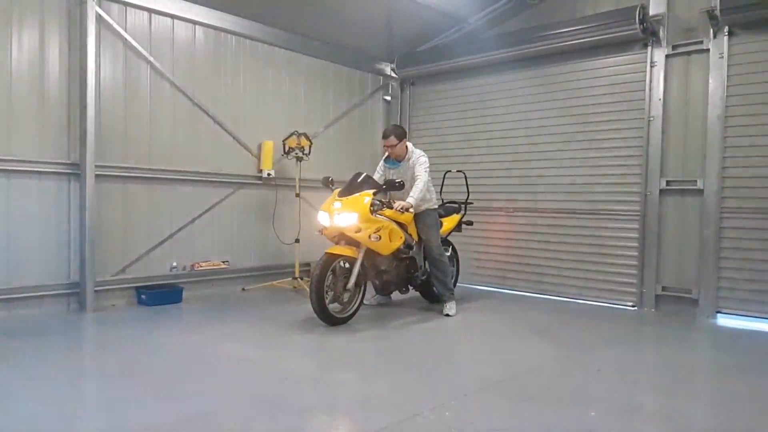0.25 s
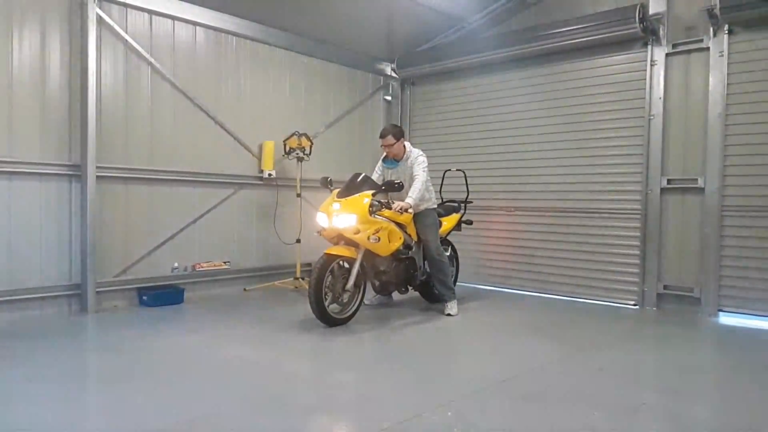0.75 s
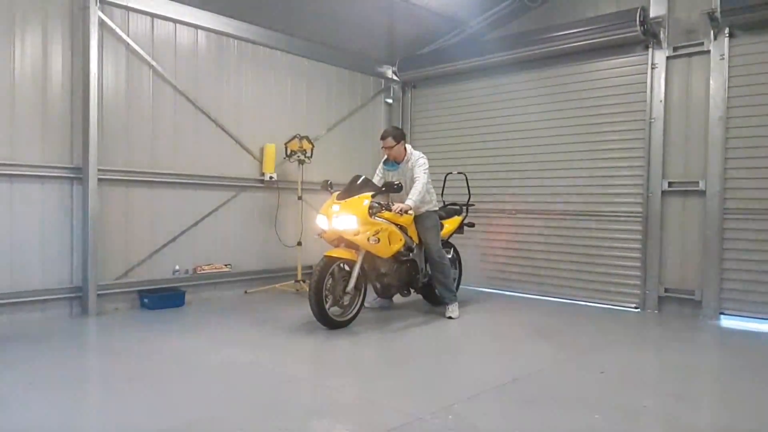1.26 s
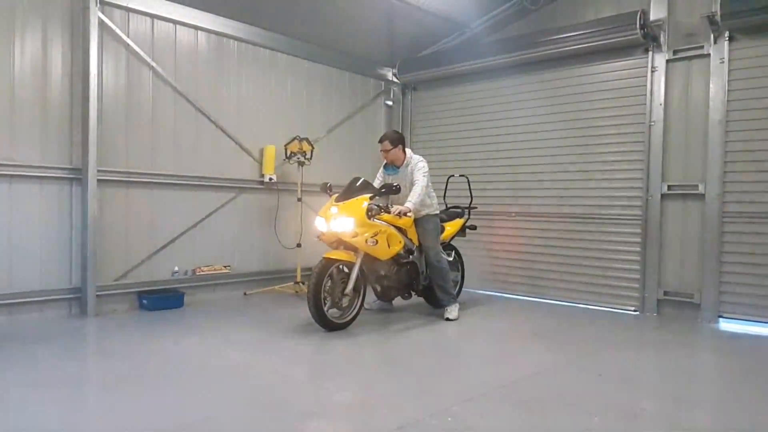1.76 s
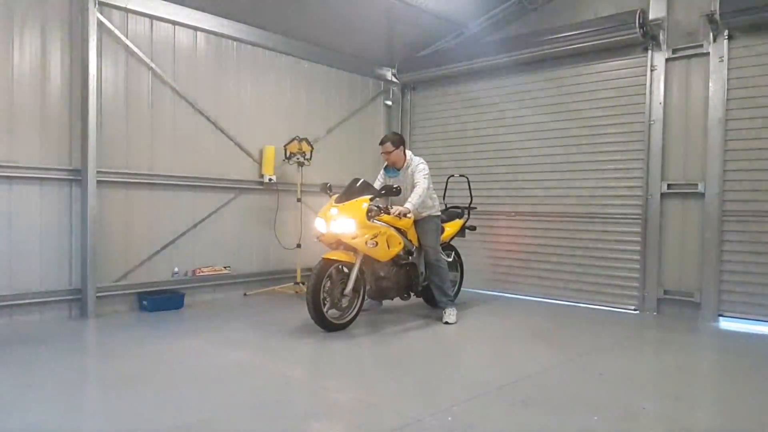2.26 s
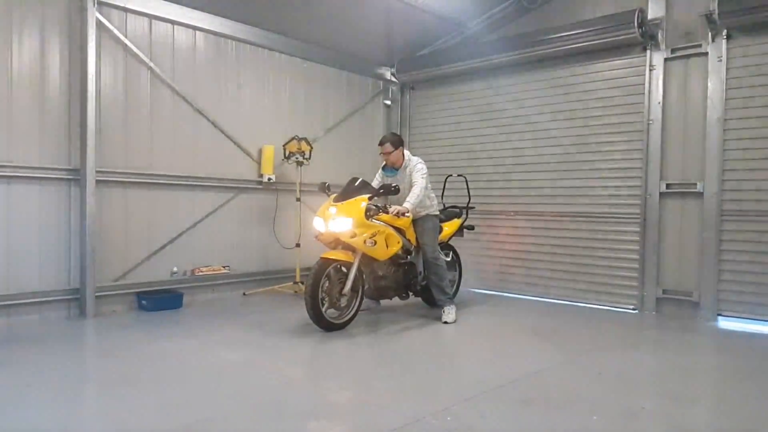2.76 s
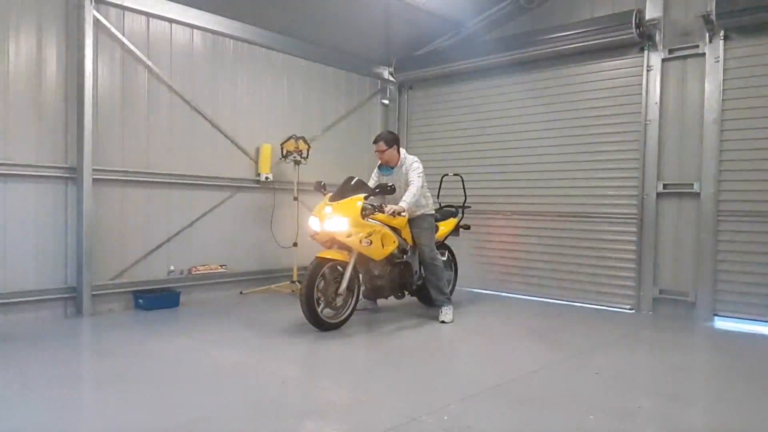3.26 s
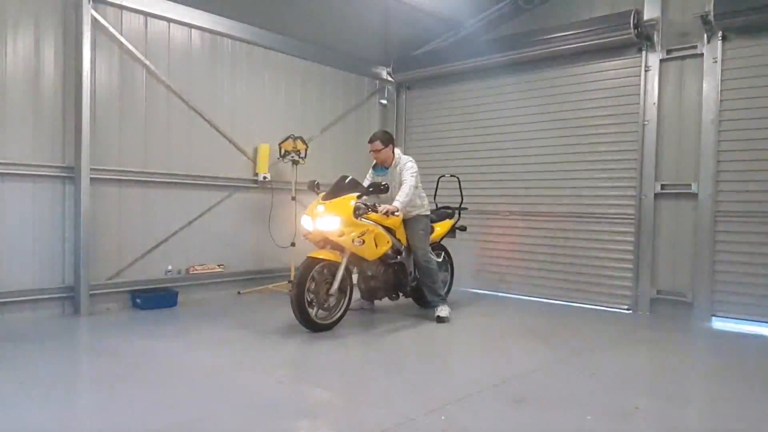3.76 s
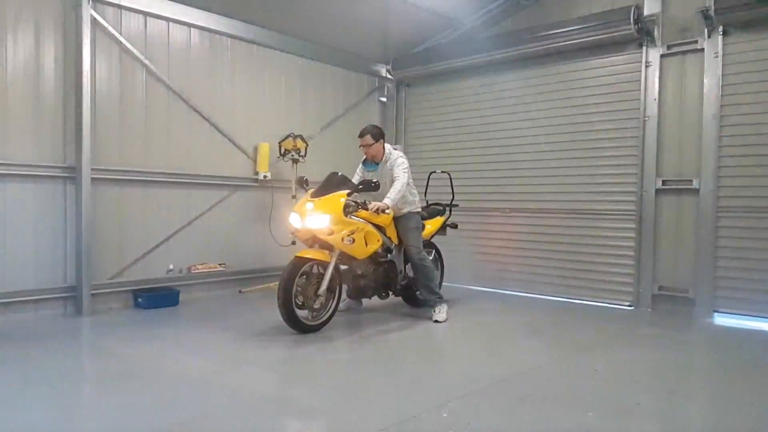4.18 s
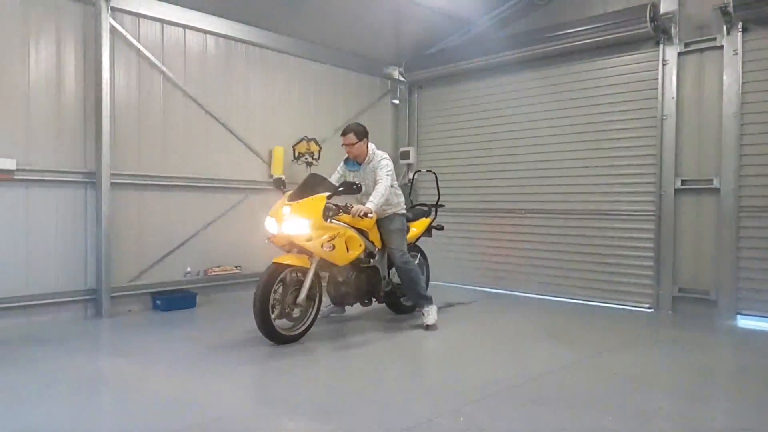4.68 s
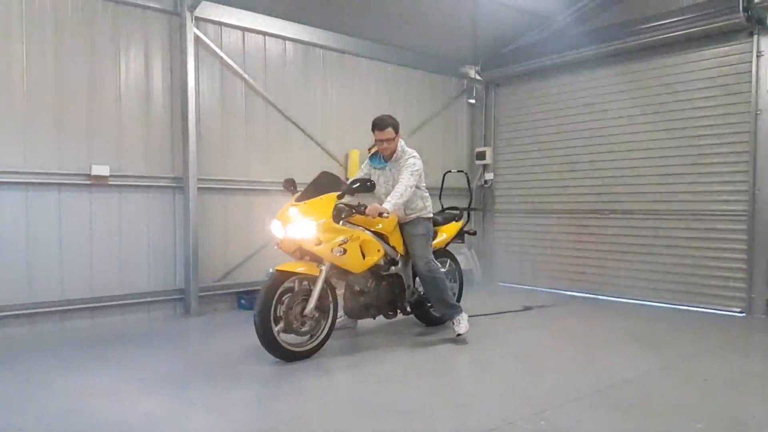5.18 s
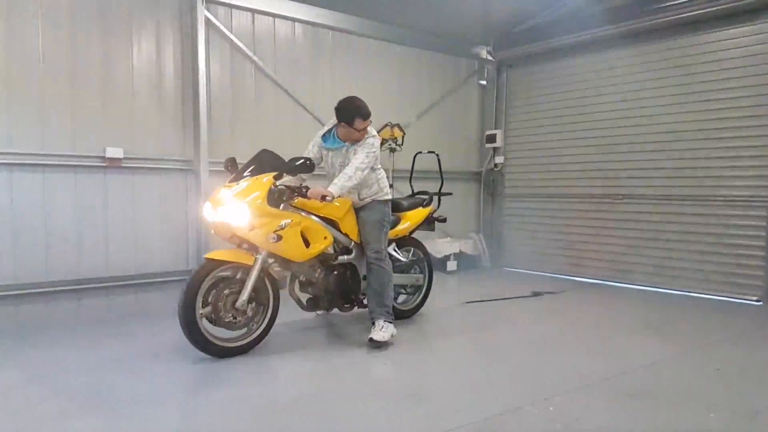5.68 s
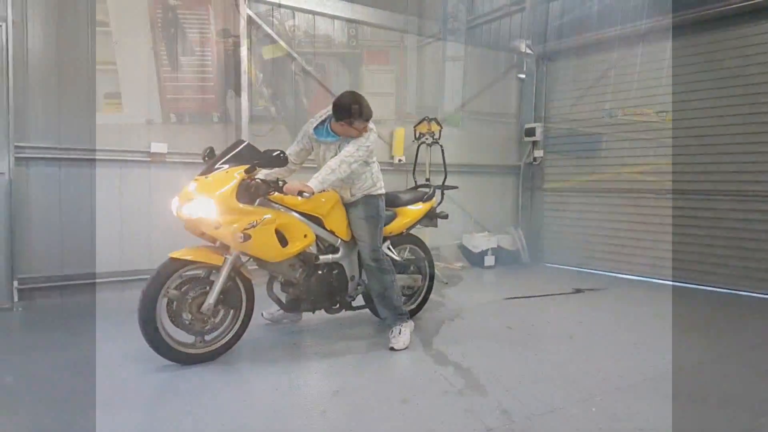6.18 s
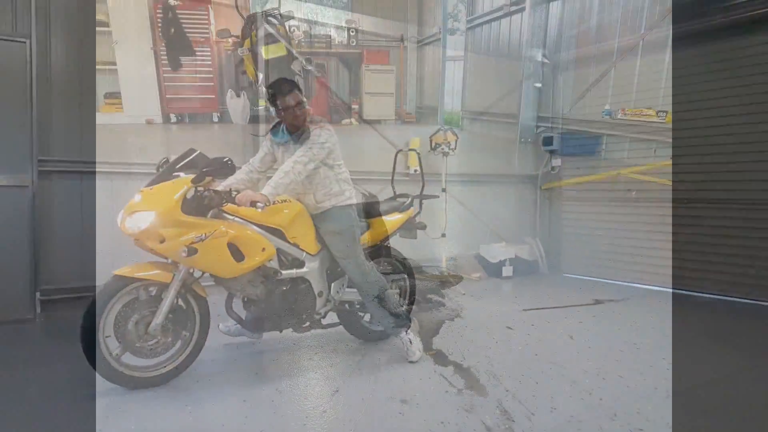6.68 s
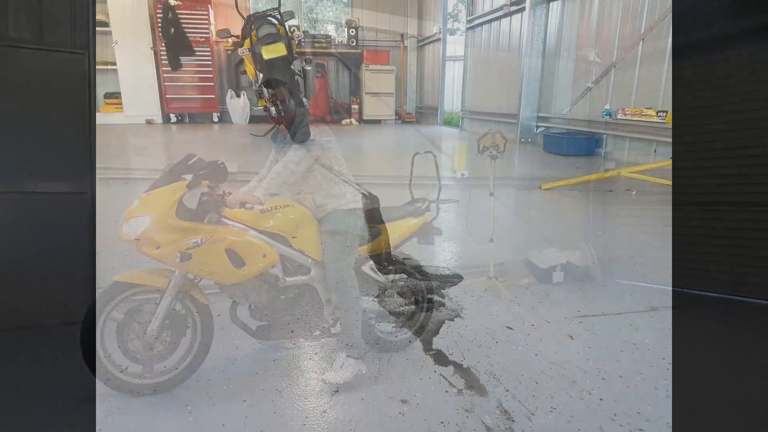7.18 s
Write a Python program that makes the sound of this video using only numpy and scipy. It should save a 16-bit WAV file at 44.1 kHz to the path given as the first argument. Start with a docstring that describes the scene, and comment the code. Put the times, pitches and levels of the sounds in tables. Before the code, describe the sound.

A two-cylinder motorcycle roars at high revs in a metal garage, tyre scrubbing the concrete, then squeals, runs down and settles into lumpy idle puffs.

```python
"""A V-twin motorcycle roars at high revs in a sheet-metal garage while its rear tyre spins on concrete.
Twice at high revs the firing turns uneven; then the throttle shuts, the tyre squeals and the revs run down.
Last come slow paired idle puffs that swell and fade. The high-rev note is a stack of sine waves, the puffs
are clicks ringing in resonances, and the roar, rasp and squeal are shaped noise."""
import sys
import numpy as np
from scipy import signal
from scipy.fft import rfft, irfft, next_fast_len
from scipy.io import wavfile
from scipy.ndimage import uniform_filter1d

SR = 44100
rng = np.random.default_rng(int(sys.argv[2]) if len(sys.argv) > 2 else 0)


def log_audio(samples):
    """Write samples as a 16-bit WAV file to the path given in sys.argv[1]."""
    # one column per channel
    frames = np.atleast_2d(samples).T
    # limit to full scale, then quantise
    limited = np.clip(frames, -1, 1)
    pcm = np.round(limited * 32767).astype(np.int16)
    wavfile.write(sys.argv[1], SR, pcm)


N = 328104   # length of the sound in samples


# Loudness of the exhaust: t/s, level/dB
EXHAUST_LEVEL = [(0, -9.5), (.5, -6.5), (1.06, -8), (1.55, -8.5), (2.08, -7.5), (2.45, -7), (3.05, -8.5),
                 (3.66, -9.5), (4.36, -8), (4.43, -14.5), (4.52, -28), (4.67, -15.5), (4.77, -23),
                 (4.82, -11), (5.02, -17.5), (5.1, -14.5), (5.3, -18.5), (5.45, -24)]
# How much of the open-throttle note is left: t/s, level/dB
THROTTLE = [(0, 0), (4.42, 0), (4.68, -2), (4.85, -11), (5.45, -12)]
COAST_WET_DB = -7   # garage echo on the shut-throttle thumps


def exhaust(firing_s, unevenness):
    """With the throttle open the pipe sings; with it shut the silencer thumps."""
    t = np.arange(N) / SR
    load = amp(in_time(THROTTLE)[0])
    strengths = amp((unevenness + 1.5) * rng.standard_normal(len(firing_s)))
    thumps = silencer(firing_s, strengths, COAST_WET_DB)
    singing = load * evened(pipe_note(firing_s, unevenness), 0.031)
    thumping = (1 - load) * evened(thumps, 0.096)
    fade_out = np.interp(t, [5.36, 5.43], [1, 0])   # the idle puffs take over
    return evened(singing + thumping, 0.33) * amp(in_time(EXHAUST_LEVEL)[0]) * fade_out


# Strength of each multiple of the cycle rate, before the resonances: multiple, level/dB
MULTIPLES = [(1, 2), (2, 2.5), (3, 3.5), (4, -0.5), (5, -3), (6, 6), (7, -1), (8, 7.5), (9, 6.5), (10, -33),
             (11, 6), (12, 5), (13, 6.5), (14, -5.5), (15, 1), (16, -34), (17, 1.5), (18, 3.5), (19, 3.5),
             (20, -16), (21, 2.5), (22, -0.5), (23, -12), (24, 2)]
# Pipe and garage resonances, compared with one another: f/Hz, width/Hz, level/dB
PIPE_RESONANCES = [(81.6, 9.3, -4.5), (172, 96, 6.5), (221.3, 11.5, 9.5), (329.3, 38, 10),
                   (384.2, 33.4, 8.5), (459.6, 46, 2), (523, 24, -1.5), (579, 37, 1), (650, 93, -5),
                   (748.5, 72, -3), (841.4, 30, -7), (951, 78, -7.5), (1270, 290, -32), (1400, 350, -10),
                   (1873, 226, -6), (2570, 610, -15), (3100, 1200, -33)]
WANDER_DB, WANDER_S = 2.5, .14   # typical swell of each multiple, and time between its random steps
LOAD_WET_DB = -10                # garage echo on the pipe note


def pipe_note(firing_s, unevenness):
    """Sines at multiples of the cycle rate, loud near a resonance; uneven firing shakes each its own way."""
    cycle_hz, turns = crank()
    stop = int(RUN_DOWN[-1][0] * SR)
    t = np.arange(stop) / SR
    grid_hz = np.arange(4200.)
    power = sum(amp(2 * db) / (1 + (2 * (grid_hz - hz) / width) ** 2) ** 2
                for hz, width, db in PIPE_RESONANCES)
    response = np.sqrt(power)
    levels_db = np.r_[np.array(MULTIPLES)[:, 1], np.full(22, -3.0)]   # 22 more multiples above the table
    note = np.zeros(N)
    for k, db in enumerate(levels_db, start=1):
        shake = unevenness * rng.standard_normal((2, len(firing_s)))
        phase_shake = np.interp(t, firing_s, .13 * shake[0])   # radians
        phase = 2 * np.pi * (k * turns[:stop] + rng.random()) + phase_shake
        level_shake = np.interp(t, firing_s, amp(.6 * shake[1]))
        resonance = np.interp(k * cycle_hz[:stop], grid_hz, response)
        # each multiple swells and fades on its own
        steps_s = np.arange(0, N / SR, WANDER_S)
        wander = amp(np.interp(t, steps_s, WANDER_DB * rng.standard_normal(len(steps_s))))
        note[:stop] += amp(db) * level_shake * resonance * wander * np.sin(phase)
    return garage(note, LOAD_WET_DB)


# Engine cycles per second at high revs: t/s, f/Hz
HIGH_REVS = [(0.0, 78.8), (0.32, 82.08), (0.59, 81.21), (0.94, 82.01), (1.14, 75.93), (1.26, 81.04),
             (1.47, 88), (1.57, 83.42), (1.63, 79.22), (1.97, 77.46), (2.28, 71.33), (2.46, 73.98),
             (2.79, 80.8), (2.88, 81.81), (3.05, 74.76), (3.31, 84.98), (3.47, 88.05), (3.54, 80.4),
             (3.74, 79.35), (3.81, 75.93), (4.09, 75), (4.17, 77.89), (4.25, 75.83), (4.4, 77.84)]
# Engine cycles per second as the revs drop: t/s, f/Hz
RUN_DOWN = [(4.45, 76), (4.52, 71.5), (4.66, 64), (4.8, 53.3), (4.9, 43), (5.04, 33.5), (5.24, 26),
            (5.3, 23.8), (5.45, 18)]


def crank():
    """Cycle rate in Hz, and its running sum: the cycles turned so far."""
    cycle_hz = in_time(HIGH_REVS + RUN_DOWN)[0]
    return cycle_hz, np.cumsum(cycle_hz) / SR


# Spells of uneven burning: start t/s, hold t/s, unevenness (scales the random shake of each firing)
STUMBLES = [(1.1, .2, 2.3), (1.4, .25, 5.5), (3.3, .2, 5.5), (3.7, .7, 2.2), (4.43, .13, 8.5)]
STEADY_UNEVENNESS, STUMBLE_RISE_S, STUMBLE_FALL_S = .7, .1, .2
REAR_LAG_CYCLES = 3 / 8   # 270 degrees of a 720-degree cycle


def firings():
    """Firing times and their unevenness: the front cylinder, then the rear one 270 degrees later."""
    turns = crank()[1]
    count = np.arange(int(turns[int(RUN_DOWN[-1][0] * SR)]))
    both_cylinders = np.c_[count, count + REAR_LAG_CYCLES].ravel()
    firing_s = np.interp(both_cylinders, turns, np.arange(N) / SR)
    spells = []
    for start, hold, peak in STUMBLES:
        corners_s = [start - STUMBLE_RISE_S, start, start + hold, start + hold + STUMBLE_FALL_S]
        spells.append(np.interp(firing_s, corners_s, [0, peak, peak, 0]))
    return firing_s, np.maximum(np.max(spells, axis=0), STEADY_UNEVENNESS)


PUFF_SPREAD_DB, PUFF_JITTER_S = 1.5, .002   # typical random change in strength and timing
IDLE_WET_DB = -1                            # garage echo on the puffs


def idle():
    """Slow exhaust puffs, each a little stronger or weaker, earlier or later."""
    puff_s, strength_db = puffs()
    chance = rng.standard_normal((len(puff_s), 2))
    uneven_s = puff_s + PUFF_JITTER_S * chance[:, 0]
    uneven_db = strength_db + PUFF_SPREAD_DB * chance[:, 1]
    return silencer(uneven_s, amp(uneven_db), IDLE_WET_DB)


# Idle pace, steady from each time on: t/s, cycle rate f/Hz, rear lag/cycles, third thump level/dB
IDLE_PACE = [(5.382, 15.42, .37, -30), (5.771, 8.62, .38, -8), (6.119, 9.28, .3, -6),
             (6.658, 8.95, .33, -16)]
# Strength of the idle puffs as they enter the silencer: t/s, level/dB
IDLE_STRENGTH = [(5.38, -15.5), (5.5, -14.5), (5.66, -32), (5.71, -22), (5.9, -12.5), (6.2, -6.5),
                 (6.5, -8), (6.8, -12), (7.1, -17), (7.44, -32)]
REAR_PUFF_DB, THIRD_LAG_CYCLES = -2.5, .69


def puffs():
    """Idle puff times and strengths: front cylinder, rear cylinder, and a weaker third thump later in each
    cycle."""
    start, rate, lag, third_db = np.transpose(IDLE_PACE)
    knots_s = np.r_[start, N / SR]
    turns = np.r_[0, np.cumsum(rate * np.diff(knots_s))]
    count = np.arange(int(turns[-1]) + 1)
    # the row of the pace table that each cycle falls in
    row = np.searchsorted(np.round(turns), count, side="right").clip(1, len(rate)) - 1
    puff_turns = np.c_[count, count + lag[row], count + THIRD_LAG_CYCLES]
    puff_s = np.interp(puff_turns, turns, knots_s)
    step_db = np.c_[0 * count, 0 * count + REAR_PUFF_DB, third_db[row]]
    strength_db = np.interp(puff_s, *np.transpose(IDLE_STRENGTH)) + step_db
    return puff_s.ravel(), strength_db.ravel()


# Silencer resonances: f/Hz, width/Hz of one pass, input level/dB, lag t/s (from 3 ms before the puff)
SILENCER = [(80, 55, -17, 0), (128, 56, -6, .002), (190, 85, -6.5, .006), (290, 100, -15, .010),
            (400, 120, -15, .011)]


def silencer(puff_s, sizes, wet_db):
    """Each soft puff swells and dies, upper chambers later: a click passes each resonance twice."""
    thumps = 0
    for hz, width, db, lag in SILENCER:
        kicks = clicks(puff_s + lag - .003, sizes * amp(db))
        once = resonate(kicks, hz, width)
        thumps = thumps + resonate(once, hz, width) * SR / width
    soft = signal.sosfilt(signal.butter(2, 260, fs=SR, output="sos"), thumps)   # low-pass at 260 Hz
    return garage(soft, wet_db)


GARAGE_T60_S = .9   # time for the echo to die by 60 dB


def garage(x, wet_db):
    """Adds the dense echo of the metal walls: noise that starts after 8 ms and dies away."""
    t = np.arange(int(GARAGE_T60_S * SR)) / SR
    tail = rng.standard_normal(len(t)) * amp(-60 * t / GARAGE_T60_S) * (t > .008)
    tail = tail / np.sqrt(np.sum(tail ** 2))
    return x + amp(wet_db) * signal.fftconvolve(x, tail)[:N]


# Tyre squeal: t/s, lowest band level/dB, second and third band level/dB against the lowest
SQUEAL_LEVEL = [(4.37, -16, -9, -9), (4.5, -22.5, -2.5, -10), (4.95, -12.5, -8, -17.5),
                (5.04, -18, -8, -18), (5.3, -23.5, -10, -25), (5.6, -37.5, -11.5, -24),
                (5.9, -52, -20, -25)]
# Squeal bands: f/Hz at pitch ratio 1, half-width/Hz of each smoothing stage
TREAD_BANDS = [(2150, 175), (3950, 400), (6350, 580)]
# Squeal pitch as the wheel slows: t/s, pitch ratio
SLIDE = [(4.4, 1.09), (4.9, 1.01), (5.2, .985), (5.9, 0.99)]


def squeal():
    """Tread blocks stick and slip: noise rings in three broad bands that sink with wheel speed."""
    level_db, second_db, third_db = in_time(SQUEAL_LEVEL)
    slide = np.cumsum(in_time(SLIDE)[0]) / SR
    bands = []
    for hz, width in TREAD_BANDS:
        slips = rng.standard_normal((2, N)) + 1j * rng.standard_normal((2, N))
        r = np.exp(-2 * np.pi * width / SR)
        # slow random wobble: the ring loses step within a few cycles
        wobble = signal.lfilter([1], [1, -2 * r, r * r], slips)
        bands.append(rms_one(np.real(wobble * np.exp(2j * np.pi * hz * slide))))
    # the tyre bites, then stands
    grips = np.interp(np.arange(N) / SR, [4.37, 4.45, 5.8, 5.95], [0, 1, 1, 0])
    mix = bands[0] + amp(second_db) * bands[1] + amp(third_db) * bands[2]
    return amp(level_db) * grips * mix


# Rasp bands: f/Hz, width/Hz of one pass, starting level/dB, share of the swing, drift in dB per s
RASP = [(2185, 260, -26, 0.95, 0), (3307, 830, -26, 0.68, -2)]
# The tread catches briefly and the rasp flares: t/s, level/dB before the band's share
CATCHES = [(.85, 5), (2.6, 7)]
CATCH_S = 0.055   # a flare falls to 37% of its dB this long before and after its peak


def rasp():
    """The tread scrubs the floor: two noisy bands that swell with the treble and stop as the tyre bites."""
    scrub = rng.standard_normal((2, N))
    t = np.arange(N) / SR
    swing_db = np.minimum(in_time(ROAR_LEVEL)[1] - ROAR_LEVEL[0][2], 4)
    for catch_s, db in CATCHES:
        swing_db = swing_db + db * np.exp(-((t - catch_s) / CATCH_S) ** 2)
    bands = 0
    for hz, width, db, share, drift in RASP:
        band = rms_one(resonate(resonate(scrub, hz, width), hz, width))
        bands = bands + amp(db + share * swing_db + drift * t) * band
    return bands * np.interp(t, [4.37, 4.45], [1, 0])


# Roar of gas and rubber: t/s, body level/dB, treble level/dB
ROAR_LEVEL = [(0, -14, -33.5), (.8, -16.5, -31.5), (1.15, -17.5, -34.5), (1.39, -12.5, -31),
              (1.62, -17, -33.5), (2.2, -16.5, -37.5), (2.85, -15, -33), (3.07, -16.5, -34.5),
              (3.33, -12.5, -30.5), (3.6, -16.5, -33.5), (4.36, -15, -37), (4.4, -14.5, -23.5),
              (4.5, -14.5, -22), (4.79, -15, -24), (4.93, -22.5, -28), (5.01, -34, -38), (5.14, -29.5, -54),
              (5.72, -42.5, -63), (6.22, -34, -49.5), (6.8, -37, -54), (7.44, -52.5, -69)]
# Tone of the body: f/Hz, relative level/dB per Hz
BODY_COLOUR = [(40, -17), (300, 2.5), (1000, -2), (1250, -5.5), (1900, -2), (2500, -7), (3600, -14),
               (5300, -23.5), (6600, -29.5), (8500, -31.5), (16000, -45)]
# Tone of the treble: f/Hz, relative level/dB per Hz
TREBLE_COLOUR = [(3000, -5), (7000, 5), (10000, -4.5), (12500, -1), (16000, -4.5)]


def roar(firing_s, depth):
    """Hiss of gas and rubber, puffed by each firing, with a thin treble layer on top."""
    body_db, treble_db = in_time(ROAR_LEVEL)
    idle_s = puffs()[0]
    idle_clicks = clicks(idle_s, np.tile([1, 1, .3], len(idle_s) // 3))
    fast_beat = signal.lfilter([1], [1, -.99], clicks(firing_s, np.ones(len(firing_s))))
    slow_beat = signal.lfilter([1.5], [1, -.9988], idle_clicks)   # idle puffs die away more slowly
    gate = evened(1 + depth * (fast_beat + slow_beat), 0.61)
    return amp(body_db) * hiss(BODY_COLOUR, gate) + amp(treble_db) * hiss(TREBLE_COLOUR, gate)


def hiss(colour, gate):
    """Two unrelated noises of one colour, both puffed by the gate; rms 1."""
    hz = np.fft.rfftfreq(N, 1 / SR) + 1
    puffed = rng.standard_normal((2, N)) * gate
    return rms_one(irfft(rfft(puffed) * amp(at_hz(colour, hz)), N))


def scattered(x, t60):
    """The same spectrum with its phases stirred by wall reflections."""
    size = next_fast_len(N + SR)
    walls = rfft(rng.standard_normal(SR) * amp(-60 * np.arange(SR) / SR / t60), size)
    return irfft(rfft(x, size) * walls / np.abs(walls), size)[:N]


# How alike left and right are: f/Hz, likeness (1 = same, 0 = unrelated)
LIKENESS = [(60, 0.92), (150, 0.95), (380, 0.84), (950, 0.21), (2380, 0.013), (5980, -0.015),
            (15000, -0.01)]
# Balance, left over right: f/Hz, level/dB
LEAN = [(60, -1), (130, 0), (290, 1), (640, 0), (1410, -5), (3100, -5), (6820, -6.5), (10000, 2.5),
        (15000, -1)]


def stereo(mid, side):
    """Two microphones: alike in the bass, unrelated in the treble, leaning right over much of the range."""
    size = next_fast_len(N + SR)
    hz = np.fft.rfftfreq(size, 1 / SR) + 1
    alike = np.clip(at_hz(LIKENESS, hz), -.9, 1)
    half_lean = at_hz(LEAN, hz) / 2
    shared = np.sqrt(1 + alike) * rfft(mid, size)
    opposed = np.sqrt(1 - alike) * rfft(side, size) * [[1], [-1]]
    pair = (shared + opposed) * amp([half_lean, -half_lean])
    return irfft(pair / np.sqrt(1 + alike), size)[:, :N]


def amp(db):
    """Turns a level in dB into a plain multiplier."""
    return 10 ** (np.asarray(db) / 20)


def rms_one(x):
    """Scales a sound to an rms (average strength) of 1."""
    return x / np.sqrt(np.mean(x ** 2) + 1e-20)


def evened(x, span_s):
    """Holds the short-time level at rms 1."""
    return x / np.sqrt(uniform_filter1d(x ** 2, int(span_s * SR)) + 1e-12)


def in_time(rows):
    """Draws straight lines between a table's times, giving each column sample by sample."""
    s, *columns = np.transpose(rows)
    return [np.interp(np.arange(N) / SR, s, column) for column in columns]


def at_hz(points, hz):
    """Reads a table between its frequencies, on a log-frequency axis."""
    table_hz, values = np.array(points)[:, 0], np.array(points)[:, 1]
    return np.interp(np.log(hz), np.log(table_hz), values)


def resonate(x, hz, width):
    """One resonance that lets its own frequency through at full strength."""
    r = np.exp(-np.pi * width / SR)
    feed = np.array([1, 0, -1]) * (1 - r * r) / 2
    ring = [1, -2 * r * np.cos(2 * np.pi * hz / SR), r * r]
    return signal.lfilter(feed, ring, x + 1e-18)


def clicks(seconds, sizes):
    """Places each click between samples by sharing it over two neighbours."""
    at = np.clip(seconds * SR, 0, N - 2)
    whole = at.astype(int)
    first = np.bincount(whole, sizes * (1 + whole - at), N)
    second = np.bincount(whole + 1, sizes * (at - whole), N)
    return first + second


def scene():
    """Engine, tyre and roar on two microphones."""
    firing_s, unevenness = firings()
    engine = exhaust(firing_s, unevenness) + idle()
    noise = roar(firing_s, depth=0.19) + rasp() + squeal()
    return stereo(engine + noise[0], scattered(engine, t60=0.31) + noise[1])


LOW_CUT_HZ, CUTOFF_HZ = 34, 16400


def record(dry):
    """The microphones lose the deepest bass, the input stage overloads softly; the top is cut."""
    dry = signal.sosfilt(signal.butter(2, LOW_CUT_HZ, "high", fs=SR, output="sos"), dry)
    loud = .97 * np.tanh(np.abs(dry) ** 2) ** .5 * np.sign(dry)
    return signal.sosfilt(signal.cheby2(18, 70, CUTOFF_HZ, fs=SR, output="sos"), loud)


dry = scene()
out = record(dry)
log_audio(out)
```